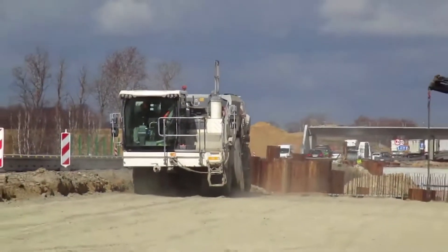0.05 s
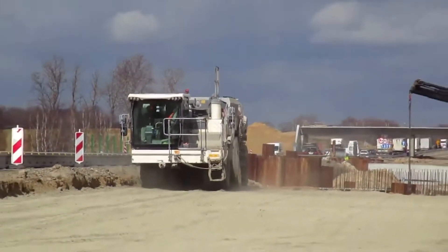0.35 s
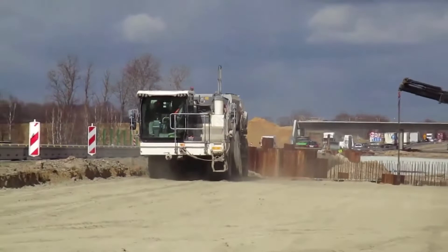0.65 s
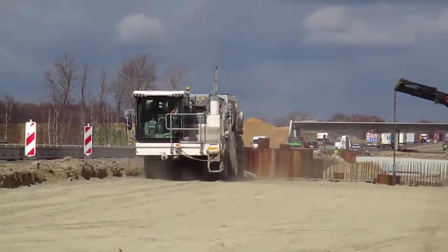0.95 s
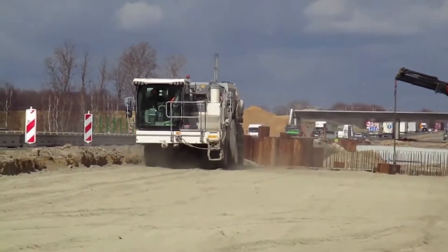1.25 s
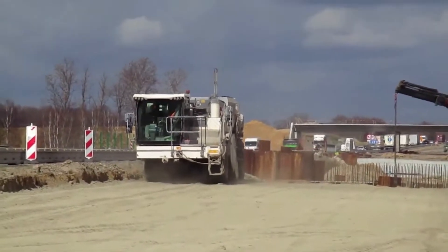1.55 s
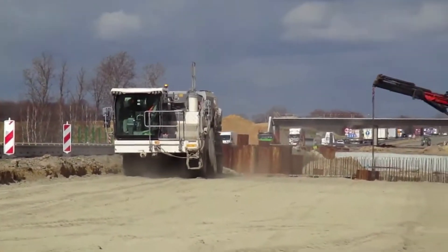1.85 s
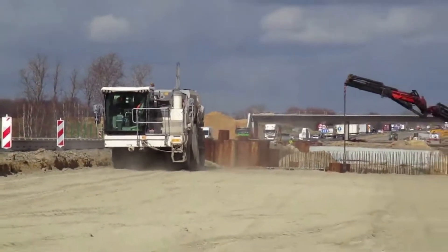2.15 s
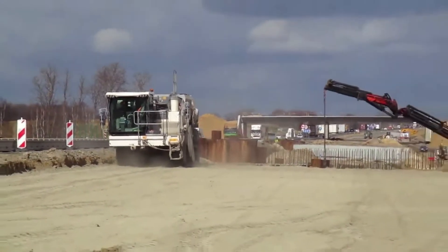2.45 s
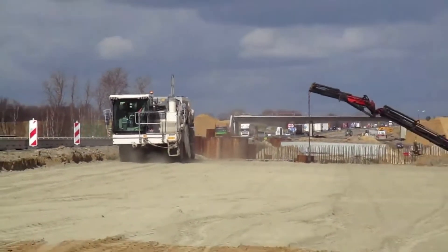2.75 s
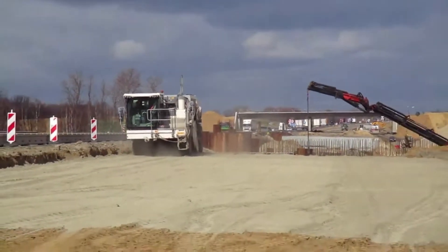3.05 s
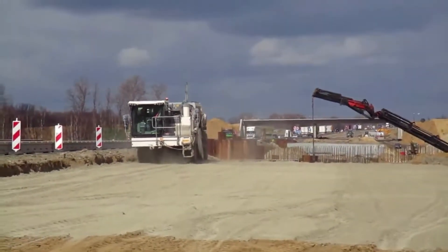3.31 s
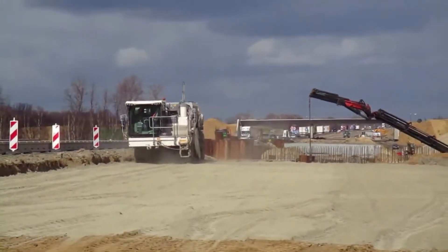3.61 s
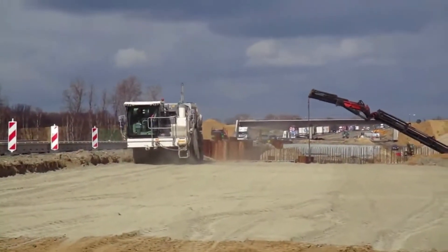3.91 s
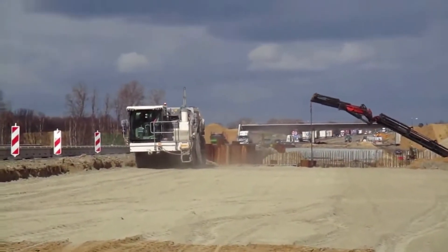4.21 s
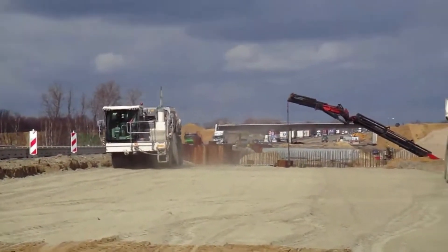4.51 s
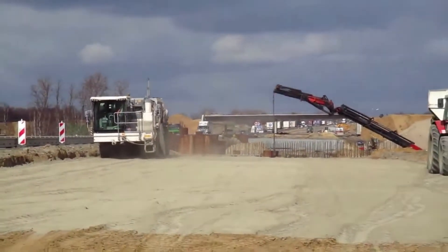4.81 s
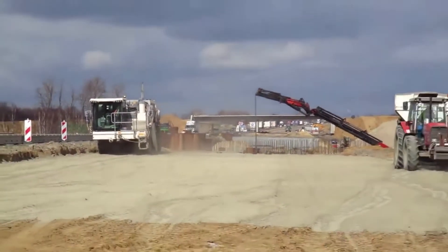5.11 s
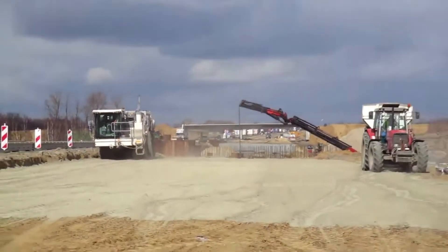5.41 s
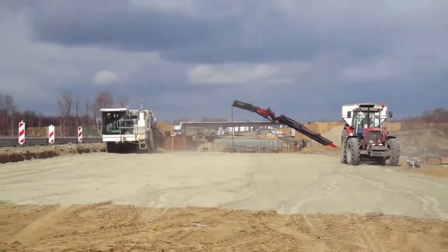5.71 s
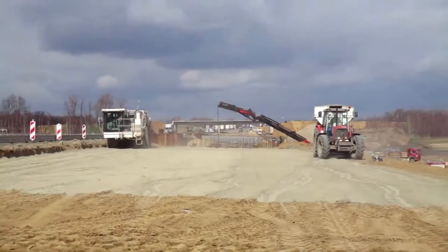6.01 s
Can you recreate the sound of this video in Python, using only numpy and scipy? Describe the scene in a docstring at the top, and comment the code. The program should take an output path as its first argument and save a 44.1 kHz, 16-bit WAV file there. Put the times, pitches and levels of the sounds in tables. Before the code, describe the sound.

A big diesel machine drones and rumbles on a building site while its thin gear whine breaks up and sinks away.

```python
"""Soil stabilizer on a road site.

A diesel throbs under load, its gear whine sinks and fades, and stones scrape in the drum.
A camera's zoom motor buzzes three times by the microphone; its electronics whistle thinly.
A hiss swells twice. One steel knock, a puff of wind, and two brief ducks of the whole sound."""
import sys
import numpy as np
from scipy.fft import rfft, irfft, next_fast_len
from scipy.io import wavfile
from scipy.ndimage import uniform_filter1d, map_coordinates

SR = 44100
rng = np.random.default_rng(int(sys.argv[2]) if len(sys.argv) > 2 else 0)


def dump(signal):
    """Clip the signal to [-1, 1] and save it as 16-bit WAV at the path in sys.argv[1]."""
    limited = np.clip(np.atleast_2d(signal).T, -1, 1)
    pcm = np.round(limited * 32767).astype(np.int16)
    wavfile.write(sys.argv[1], SR, pcm)


N = 276066

# hiss surges: (crest time [s], swell level [dB], burst level [dB])
SURGES = [(1.968, -52, -44.5), (4.874, -45.5, -47)]


def amp(db):
    """Decibels to gain."""
    return 10 ** (np.asarray(db) / 20)


def unit(x):
    """Scale to rms 1."""
    return x / np.sqrt(np.mean(x ** 2) + 1e-20)


def clock():
    """Sample times [s]."""
    return np.arange(N) / SR


def curves(rows):
    """One value per sample for each column after the time."""
    times_s, *columns = np.transpose(rows)
    return [np.interp(clock(), times_s, column) for column in columns]


def wobble(rate_hz):
    """Smooth random curve with knots at rate_hz."""
    return map_coordinates(rng.standard_normal(int(N * rate_hz / SR) + 4), [clock() * rate_hz])


def swell(centre_s, width_s):
    """Gaussian envelope, peak 1."""
    return np.exp(-.5 * ((clock() - centre_s) / width_s) ** 2)


def fading(start_db, db_per_s):
    """Steadily sinking gain."""
    return amp(start_db - db_per_s * clock())


def surging():
    """Surge gain: slow build to each crest, fast collapse."""
    t = clock()
    build_db_per_s, collapse_db_per_s = 11.5, 141
    return sum(amp(db - np.maximum(build_db_per_s * (s - t), collapse_db_per_s * (t - s)))
               for s, db, _ in SURGES)


def filtered(x, response):
    """Apply a frequency response by FFT."""
    size = next_fast_len(N + SR // 2)
    return irfft(rfft(x, size) * response(np.fft.rfftfreq(size, 1 / SR)), size)[:N]


def coloured(x, spectrum):
    """x shaped by (frequency [Hz], gain [dB]) points, rms 1."""
    points_hz, db = np.transpose(spectrum)
    return unit(filtered(x, lambda hz: amp(np.interp(np.log(hz + 1), np.log(points_hz), db))))


def noise(spectrum):
    """Coloured noise, rms 1."""
    return coloured(rng.standard_normal(N), spectrum)


def turns(hz):
    """Phase [turns] of a changing frequency."""
    return np.cumsum(hz) / SR


def tone(turn):
    """Sinusoid, rms 1."""
    return np.sqrt(2) * np.cos(2 * np.pi * turn)


def gate(turn, sharp):
    """One swell per turn, rms 1."""
    return unit(np.exp(sharp * np.cos(2 * np.pi * turn)))


def flutter(turn):
    """Tone wavering in moving air."""
    return amp(1.8 * wobble(26)) * tone(turn + .042 * wobble(38))


def flicker(turn):
    """Tone that breaks up and shimmers, rms 1."""
    return unit(amp(3 * wobble(30)) * tone(turn + .06 * wobble(60)))


def electronics():
    """Camera circuits: hiss, a pulsing high whistle and a lower one that swells with the surges."""
    # hiss floor: (frequency [Hz], gain [dB])
    floor_colour = [(2000, -18.5), (4000, -15), (4900, -11.5), (6000, 5), (8000, 3), (10500, 1), (12500, 2),
                    (15500, -19)]
    t = clock()
    high_hz, low_hz, frame_hz = 11793, 3941, 30
    frame = frame_hz * t
    high = amp(-64.5) * tone(high_hz * t + .06 * tone(frame)) * gate(frame + 1 / 4, sharp=.15)
    low = (amp(-89) + amp(-25) * surging()) * tone(low_hz * t)
    return high + low + amp(-67) * noise(floor_colour)


def swelling_hiss(rest_db=-74, burst_lead_s=.016):
    """A hiss builds slowly, bursts just before each crest and collapses."""
    # swelling hiss: (frequency [Hz], gain [dB])
    swell_colour = [(400, -10.5), (1200, 10), (2000, 0.5), (2600, -4), (3300, -10), (4500, -12),
                    (6000, -13.5), (8000, -19.5), (15000, -34)]
    # burst: (frequency [Hz], gain [dB])
    burst_colour = [(400, -10.5), (1200, 9), (2200, -3.5), (3200, -5), (5500, -11), (8000, -20),
                    (15000, -26)]
    waver = amp(.64 * wobble(14))
    swells = (amp(rest_db) + surging()) * noise(swell_colour)
    bursts = sum(amp(db) * swell(s - burst_lead_s, width_s=.048) for s, _, db in SURGES)
    return waver * (swells + bursts * noise(burst_colour))


def barrel_pings(step_hz, width_s=.0005):
    """Each motor step rings the lens barrel at a random pitch and strength; rms 1."""
    t = clock()
    step = np.round(t * step_hz).astype(int)
    pitch, strength, phase = rng.standard_normal((step[-1] + 1, 3))[step].T
    hz = np.clip(11200 + 600 * pitch, 8500, 12300)
    offset_s = t - step / step_hz
    envelope = amp(2 * strength) * np.exp(-.5 * (offset_s / width_s) ** 2)
    return unit(envelope * tone(hz * offset_s + phase))


def zoom_motor(step_hz=83.3):
    """A stepper ticks in a fast, uneven buzz."""
    # motor runs: (start [s], end [s], level [dB])
    runs = [(0, 0.6, -60.5), (1.963, 3.01, -62.5), (4.867, 6.044, -63.5)]
    # motor noise: (frequency [Hz], gain [dB])
    motor_colour = [(4500, -18), (6500, -9.5), (8500, -3.5), (9800, 1.5), (10500, -6), (11100, -1),
                    (11900, 0.5), (12600, -4), (13400, -18), (15500, -16.5)]
    t = clock()
    step = step_hz * t
    running = sum(amp(db) * np.clip(np.minimum(t - start, end - t) / .0067, 0, 1)
                  for start, end, db in runs)
    ticks = unit(gate(step, sharp=.27) * gate(2 * step, sharp=.1) * gate(4 * step, sharp=.17))
    ring = amp(-6) * barrel_pings(step_hz)
    return running * unit(ticks * amp(wobble(70)) * noise(motor_colour) + ring)


def lens_clicks():
    """The lens rasps and ticks as it catches and brakes, sounding the camera's shell."""
    # lens ticks: (time [s], level [dB], width [s], shell re tick [dB])
    stops = [(.539, -50.5, .007, -14), (.541, -49, .0012, -14), (1.997, -53, .001, -12),
             (2.947, -52, .01, -7), (2.953, -49, .0015, -10), (5.995, -51, .003, -7),
             (5.999, -46, .0014, -13), (6.0036, -46, .0014, -3)]
    rasp = sum(amp(db) * swell(s, width_s) for s, db, width_s, _ in stops)
    rasp *= noise([(4800, -20), (7200, -1), (8500, -3), (11000, 2.5), (13000, -4), (15500, -15)])
    shell = sum(amp(db + shell_db) * swell(s, width_s) for s, db, width_s, shell_db in stops)
    shell *= noise([(1000, -20), (1900, 9), (3400, 3), (4800, -25), (9000, -42)])
    return rasp + shell


def wind():
    """Low puffs of air on the microphone."""
    # puffs: (time [s], level [dB], width [s])
    puffs = [(5.155, -23, .016), (5.205, -30, .02), (5.268, -20.5, .012), (5.322, -21, .021),
             (5.78, -34, .076)]
    colour = [(25, -27), (50, -20), (68, -.5), (125, -2), (200, -9), (350, -20), (900, -41), (3000, -105)]
    return sum(amp(db) * swell(s, width_s) for s, db, width_s in puffs) * noise(colour)


def knock(attack_s=.0019):
    """Loose steel clunks: a few quick blows, each a clatter and a short ring."""
    # blows: (time [s], level [dB], clatter t60 [s])
    blows = [(2.265, -33, .12), (2.272, -29.5, .15), (2.281, -30, .17), (2.296, -34.5, .11),
             (2.312, -35, .09)]
    # steel modes: (frequency [Hz], level re blow [dB], t60 [s])
    modes = [(129, -1, .22), (335, -7, .14), (899, -12, .12), (1890, -28, .08)]
    # dull clatter: (frequency [Hz], gain [dB])
    clatter_colour = [(60, -9), (130, 5), (300, 7), (430, 2), (600, 4), (850, 4), (1000, -2), (1250, -8),
                      (1550, -19), (1950, -13.5), (2400, -15.5), (2700, -29), (4500, -41), (9000, -57)]
    out = np.zeros(N)
    for s, db, clatter_t60_s in blows:
        age_s = np.maximum(clock() - s, 0)
        ring = sum(amp(mode_db - 60 * age_s / t60_s) * tone(hz * age_s + rng.random())
                   for hz, mode_db, t60_s in modes)
        clatter = amp(-60 * age_s / clatter_t60_s) * noise(clatter_colour)
        out += amp(db) * np.minimum(age_s / attack_s, 1) * (ring + clatter)
    return out


def squeal(at_s=1.835, pitch_hz=8700):
    """Moving steel: a faint rough squeal in a short rub, just before the first crest."""
    rough = amp(3 * wobble(50)) * tone(turns(pitch_hz * (1 + .014 * wobble(300))))
    rub = noise([(1500, -15), (3000, 0), (5500, -3), (9000, -9), (13000, -25)])
    return amp(-68.5) * swell(at_s, width_s=.018) * rough + amp(-61) * swell(at_s, width_s=.025) * rub


def scrape(grains_per_s=700):
    """Stones grind in the drum: clumped grains ring its housing; a few crack sharply."""
    # grinding: (time [s], level [dB])
    grind_levels = [(.9, -73), (1.3, -60.5), (1.9, -64), (2.12, -92), (2.7, -60.5), (3.1, -70), (3.55, -61),
                    (4.35, -59), (4.8, -60), (5.05, -81)]
    # housing resonances: (frequency [Hz], gain [dB])
    housing = [(1300, -9), (1900, 3), (2150, -11), (2420, 3.5), (2650, -15), (2850, 3), (3080, -14),
               (3250, -7), (3700, -18.5), (4700, -21), (6000, -19.5), (9000, -33.5)]
    # cracking stones: (time [s], level [dB])
    stones = [(1.9, -43), (4.215, -46), (4.396, -47), (4.613, -45), (4.779, -41), (4.903, -41)]
    grains = (rng.random(N) < grains_per_s / SR) * rng.standard_normal(N)
    clumps = unit(amp(1.5 * wobble(22)))
    grinding = amp(curves(grind_levels)[0]) * clumps * coloured(grains, housing)
    cracks = sum(amp(db) * swell(s, width_s=.0013) for s, db in stones)
    return grinding + cracks * noise(housing)


def whines(cycle_hz):
    """Gears whine over their shaft's hum; faint fan tone; pump tones locked to the engine."""
    # gear mesh: (time [s], frequency [Hz])
    mesh_pitch = [(0, 618), (.7, 603), (1.3, 586), (2.1, 571), (3.1, 573), (4, 578), (6.26, 576)]
    # main whine: (time [s], level [dB])
    whine_levels = [(0, -36), (.32, -35.5), (.41, -45), (.5, -34.5), (.58, -42), (.63, -32), (.72, -26.2),
                    (1.06, -30.5), (1.16, -37), (1.22, -30.5), (1.3, -28), (1.39, -44), (1.64, -37),
                    (1.72, -45), (2.17, -39.5), (2.3, -50), (2.6, -51), (2.72, -41), (2.95, -46),
                    (3.17, -42.5), (3.4, -54), (4.3, -49), (5.35, -47), (5.6, -56)]
    # other gears: (frequency re mesh [ratio], start level [dB], fade [dB/s])
    gears = [(.5, -44, 3), (1.5, -47, 8)]
    # pump tones: (time [s], width [s], multiple of cycle rate [ratio], level [dB])
    pump_tones = [(4.9, .8, 24.2, -50.5), (3.25, .48, 48.45, -49), (3.47, .08, 48.45, -52),
                  (6.2, .16, 48.5, -45.5), (2.65, .03, 141, -61), (2.95, .3, 140.2, -64.5),
                  (3.79, .09, 140.3, -58.5), (3.45, .27, 219, -73.5), (4.27, .27, 151.5, -65)]
    tooth_jitter_turns, crank_jitter_turns, fan_hz = .027, .0006, 431
    mesh, cycle = turns(curves(mesh_pitch)[0]), turns(cycle_hz)
    main_gear = amp(curves(whine_levels)[0]) * flutter(mesh + tooth_jitter_turns * wobble(90))
    other_gears = sum(fading(db, db_per_s) * flicker(ratio * mesh) for ratio, db, db_per_s in gears)
    shaft = fading(-37, db_per_s=1.9) * amp(1.2 * wobble(5)) * tone(mesh / 11.5 + .05 * wobble(6))
    fan = amp(-49.5) * swell(3.1, width_s=2.2) * flutter(fan_hz * clock())
    pumps = sum(amp(db) * swell(s, width_s) * flicker(k * (cycle + crank_jitter_turns * wobble(60)))
                for s, width_s, k, db in pump_tones)
    return main_gear + other_gears + shaft + fan + pumps


def machine_noise(cycle_hz, settle_s=2.58):
    """The drum rumbles in the soil; combustion roar and rattle pulse with the crank."""
    # drum rumble: (frequency [Hz], gain [dB])
    rumble_colour = [(10, -37.5), (22, -20), (31, -26), (42, -1.5), (52, 0), (63, -4), (78, 0), (108, -.5),
                     (145, -5.5), (210, -5), (280, -8.5), (400, -20), (900, -63)]
    # combustion roar: (frequency [Hz], gain [dB])
    roar_colour = [(100, -1), (220, -2.5), (300, -1), (480, -1.5), (700, -2), (900, -7.5), (1100, -10.5),
                   (1350, -27), (2000, -28.5), (4000, -55.5)]
    # rattle: (frequency [Hz], gain [dB])
    rattle_colour = [(600, 2.5), (1200, -1), (1600, 0), (2000, 1.5), (2500, -1), (3100, -10.5), (4000, -18),
                     (5000, -44.5), (9000, -45.5)]
    cycle = turns(cycle_hz)
    firing = unit(gate(6 * cycle, sharp=.12) * gate(2 * cycle, sharp=.09))
    effort = np.exp(-(clock() / settle_s) ** 2)
    rumble = amp(-37.3 + 5 * effort + 1.3 * wobble(6.7)) * noise(rumble_colour)
    roar = amp(-39.5 + 6 * effort + .53 * wobble(12)) * noise(roar_colour)
    rattle_gain = np.hypot(amp(-59), amp(-2) * surging())  # rattle swells and dulls with the hiss
    rattle = rattle_gain * amp(.69 * wobble(7.8)) * noise(rattle_colour)
    return rumble + firing * (roar + rattle)


def exhaust(cycle_hz, lag_turns=.046, smear_turns=.055):
    """Unequal cylinders: weak orders throb around two firm ones; the silencer smears each beat."""
    # beating drone: (time [s], 9th order level [dB], 10th order level [dB])
    drone_levels = [(0, -33, -41), (.4, -31.5, -42), (.8, -31, -36.5), (1.6, -30.8, -38), (2.1, -33.5, -41),
                    (2.6, -35.5, -39.5), (3.05, -36, -54), (3.5, -35, -41), (3.9, -32, -38.5),
                    (4.5, -37, -34), (4.9, -37, -35), (5.3, -31.5, -33), (5.6, -34.5, -34), (6, -34, -41)]
    # weak orders: (multiple of cycle rate [ratio], relative level [dB])
    weak_orders = [(2.5, -5), (3, -15), (5, -10.5), (6, -11), (6.5, -15), (7, -14), (11, -10), (13, -11.5),
                   (14, -10), (15, -10.5), (17, -20), (18, -18), (20, -22), (22, -23), (28, -21)]
    # orders lost when the engine lugs: (multiple of cycle rate [ratio], level [dB])
    lug_orders = [(8, -39.5), (12, -38.5)]
    lug_hz, lug_width_hz = 15.88, .3
    cycle = turns(cycle_hz)

    def order(k, drift_turns=0):
        return tone(k * (cycle - lag_turns) - smear_turns * (k - 9) ** 2 + drift_turns)

    def drifting(orders):
        return sum(amp(db) * order(k, .05 * wobble(2)) * amp(1.2 * wobble(2)) for k, db in orders)

    ninth_db, tenth_db = curves(drone_levels)
    drone = amp(ninth_db) * order(9) + amp(tenth_db) * order(10)
    throb = fading(-33, db_per_s=.75) * drifting(weak_orders)
    free_running = 1 - np.exp(-((cycle_hz - lug_hz) / lug_width_hz) ** 2)
    return drone + throb + free_running * drifting(lug_orders)


def scene():
    """Machine, swelling hiss, knock, wind and camera, mono."""
    # engine speed: (time [s], cycle rate [Hz])
    engine_speed = [(0, 16.61), (.6, 16.4), (1.2, 16.335), (1.8, 16.38), (2.4, 16.51), (3, 16.66),
                    (3.6, 16.33), (4.2, 16.16), (4.8, 15.88), (5.4, 15.96), (5.9, 16.325), (6.26, 16.43)]
    cycle_hz, = curves(engine_speed)
    machine = exhaust(cycle_hz) + machine_noise(cycle_hz) + whines(cycle_hz) + squeal() + scrape()
    mix = machine + swelling_hiss() + knock() + wind()
    camera = zoom_motor() + lens_clicks() + electronics()
    return (mix + camera)[None]


def record(dry):
    """The level ducks twice, snapping back with a click the second time; brick-wall low-pass."""
    # ducks: (start [s], end [s], gain [dB])
    dips = [(1.903, 1.968, -8.5), (4.807, 4.874, -9.5)]
    click_decay_s, cutoff_hz = .0006, 15750
    t = clock()
    duck_db = sum(db * ((t > start) & (t < end)) for start, end, db in dips)
    duck = amp(uniform_filter1d(duck_db, size=130))
    click = amp(-33.5) * np.exp(-np.abs(t - dips[-1][1]) / click_decay_s)
    click *= noise([(300, 0), (2000, -4), (6000, -10), (15000, -18)])
    return filtered(dry[0] * duck + click, lambda hz: hz < cutoff_hz)[None]


dry = scene()
out = record(dry)
dump(out)
```